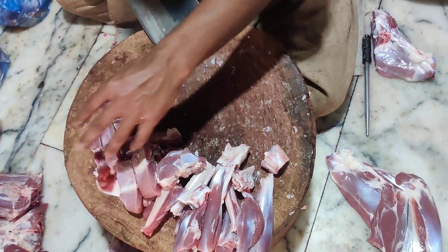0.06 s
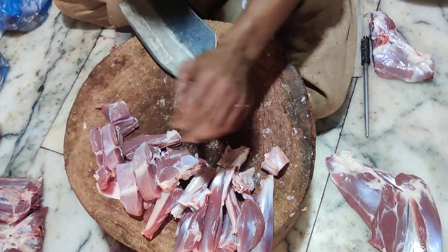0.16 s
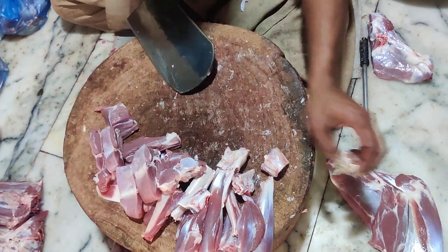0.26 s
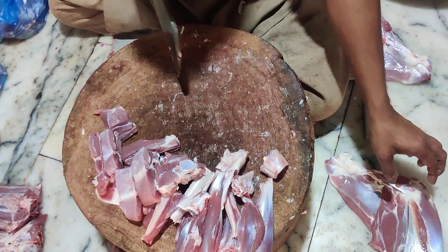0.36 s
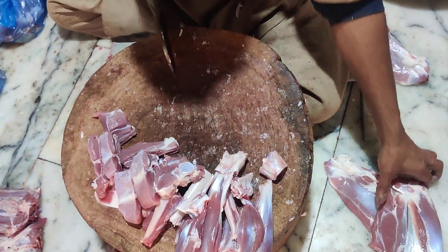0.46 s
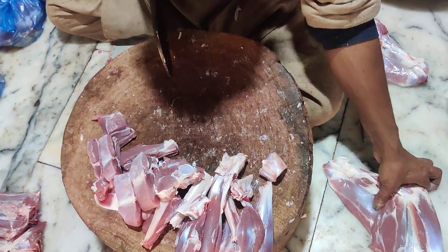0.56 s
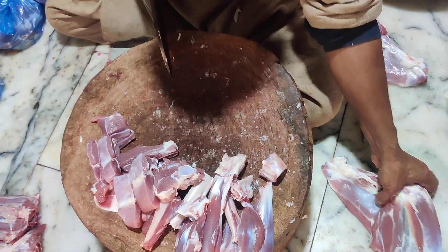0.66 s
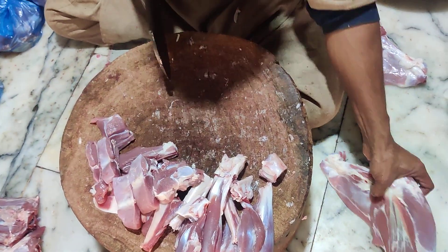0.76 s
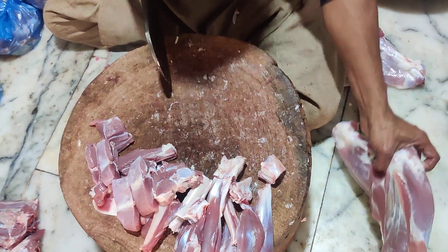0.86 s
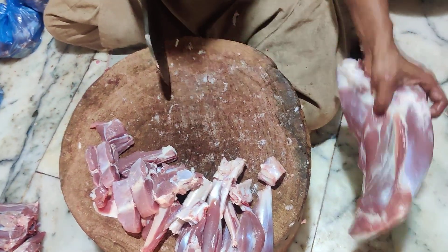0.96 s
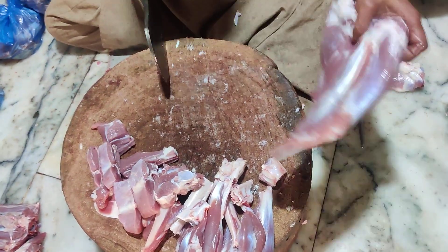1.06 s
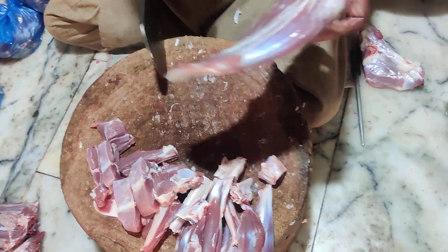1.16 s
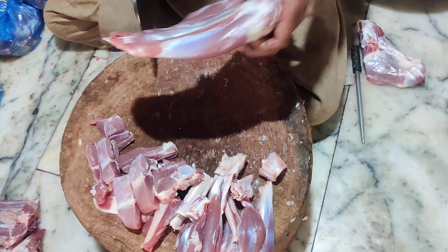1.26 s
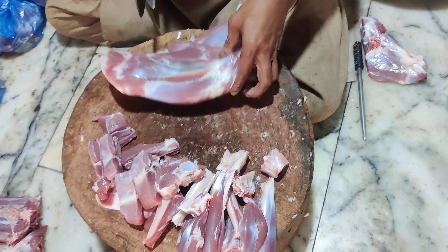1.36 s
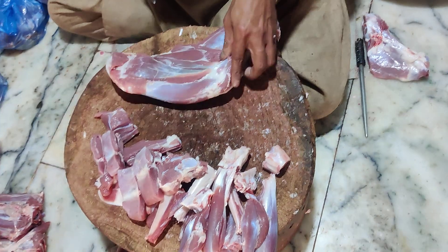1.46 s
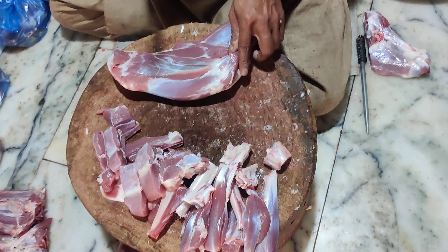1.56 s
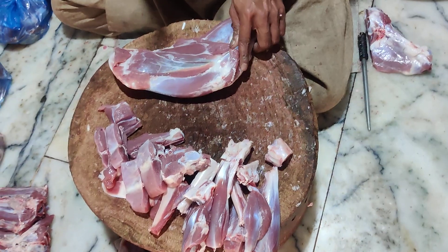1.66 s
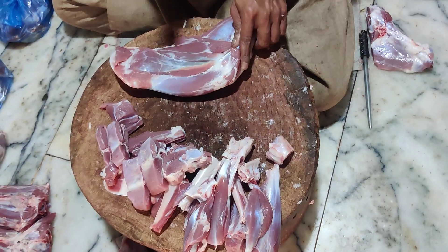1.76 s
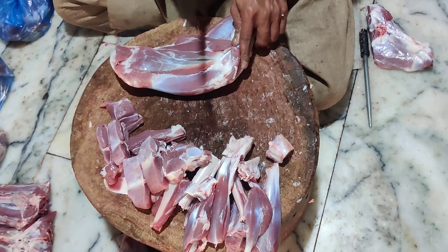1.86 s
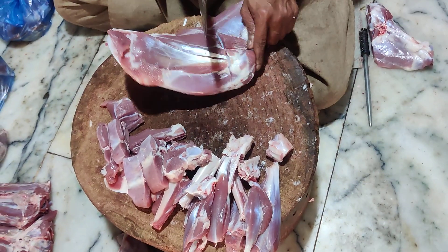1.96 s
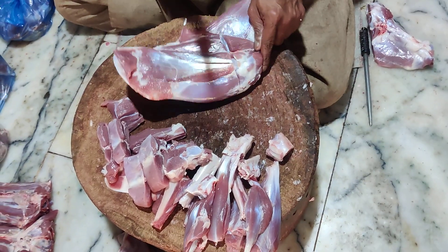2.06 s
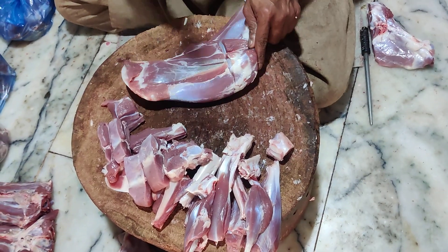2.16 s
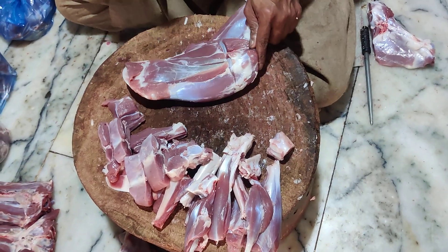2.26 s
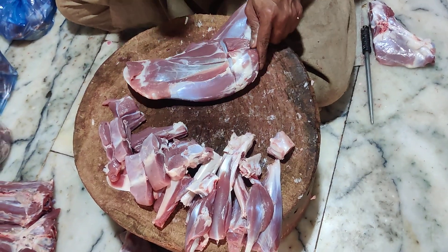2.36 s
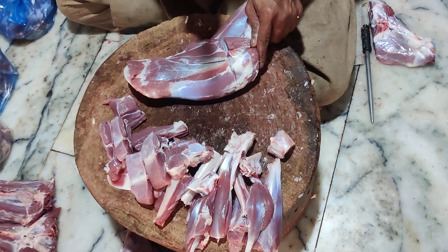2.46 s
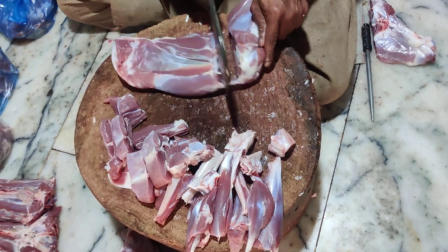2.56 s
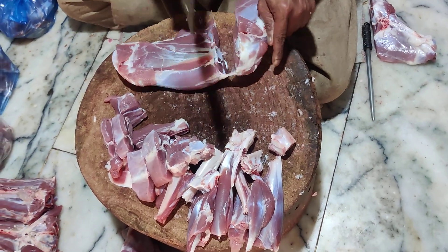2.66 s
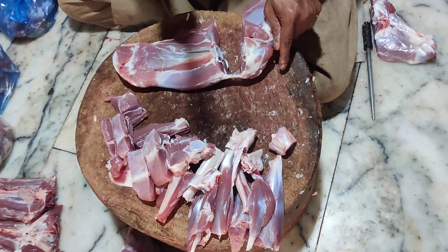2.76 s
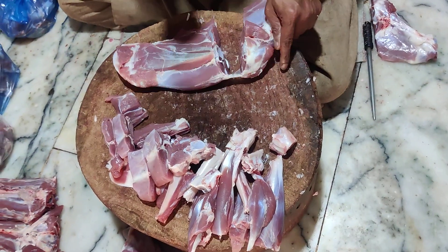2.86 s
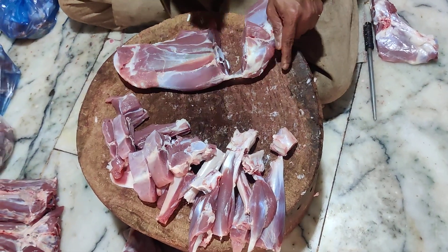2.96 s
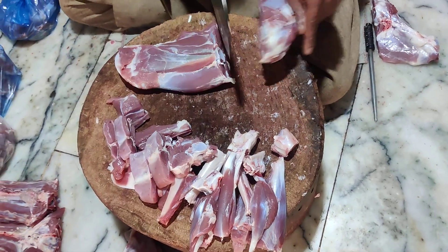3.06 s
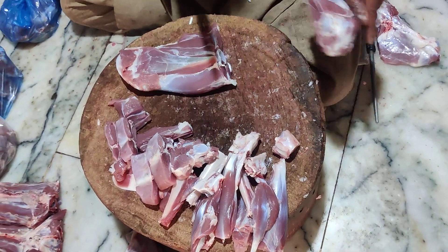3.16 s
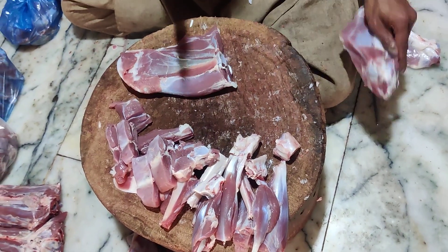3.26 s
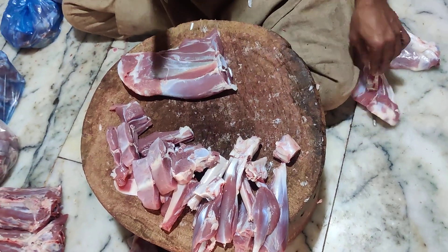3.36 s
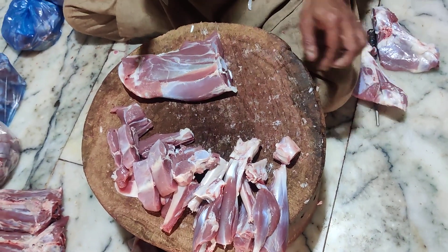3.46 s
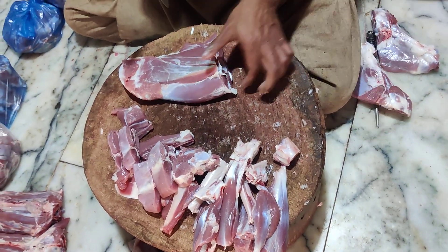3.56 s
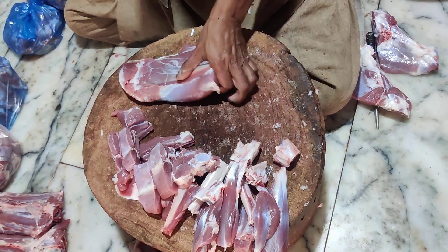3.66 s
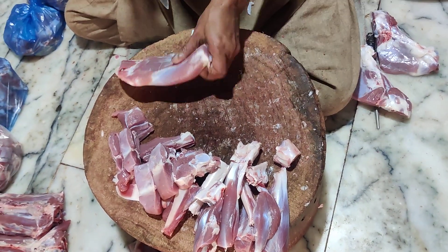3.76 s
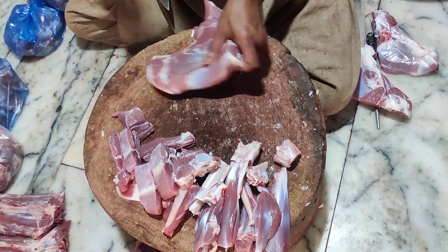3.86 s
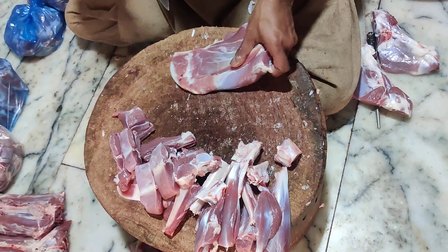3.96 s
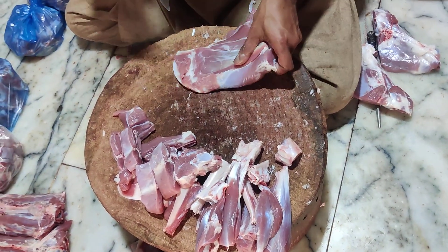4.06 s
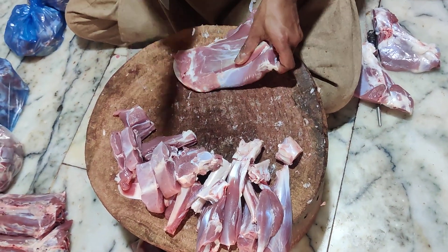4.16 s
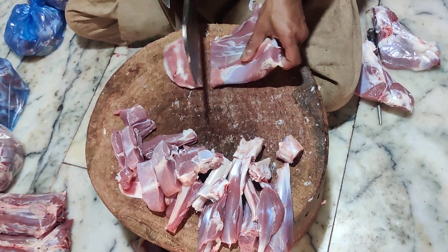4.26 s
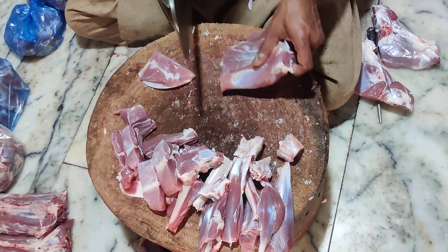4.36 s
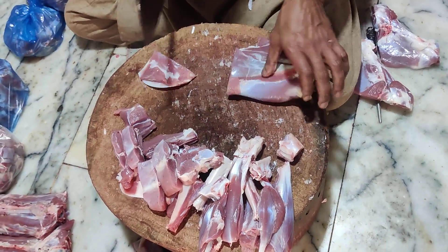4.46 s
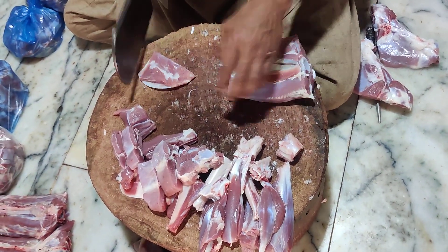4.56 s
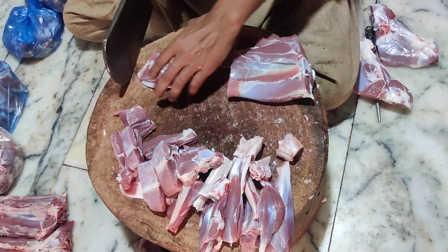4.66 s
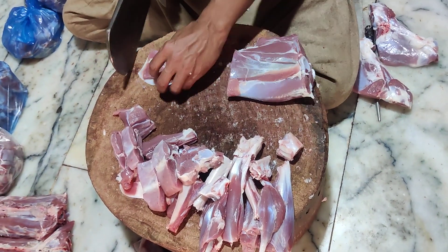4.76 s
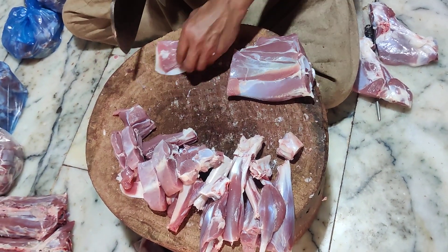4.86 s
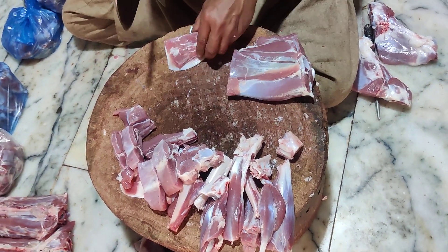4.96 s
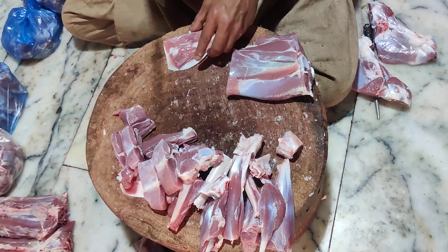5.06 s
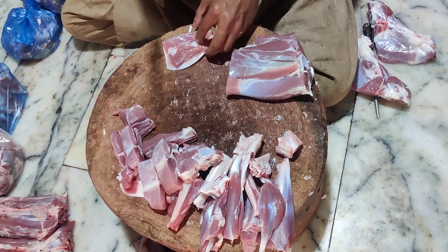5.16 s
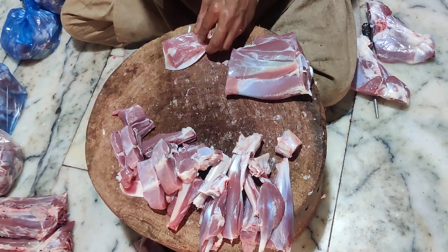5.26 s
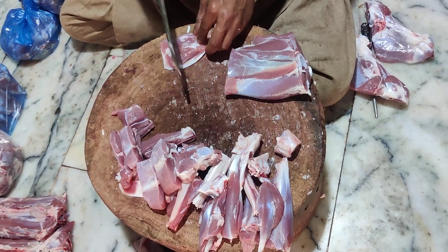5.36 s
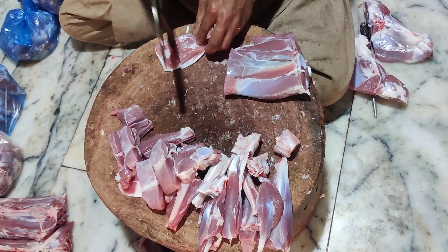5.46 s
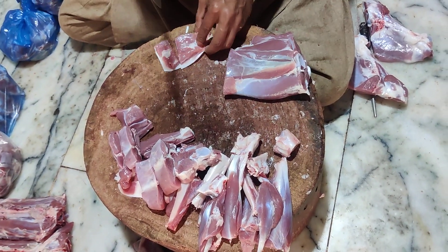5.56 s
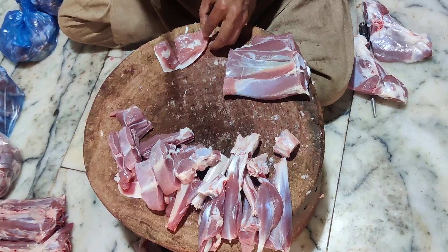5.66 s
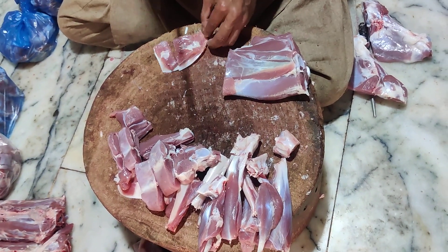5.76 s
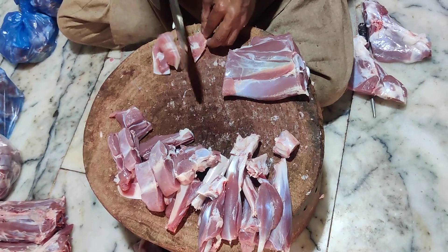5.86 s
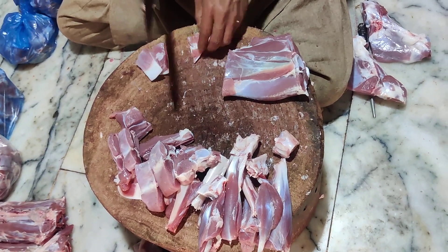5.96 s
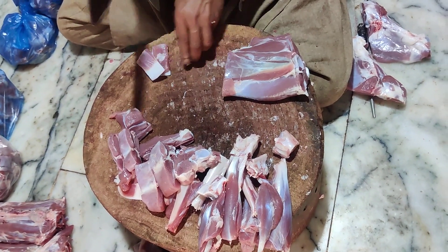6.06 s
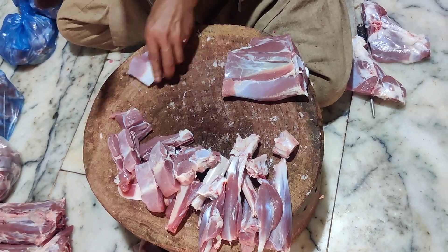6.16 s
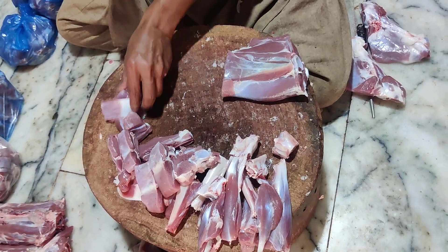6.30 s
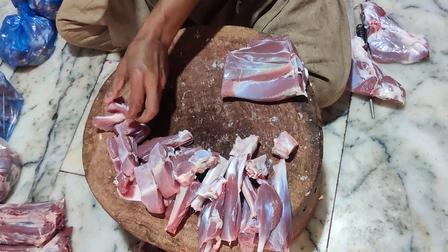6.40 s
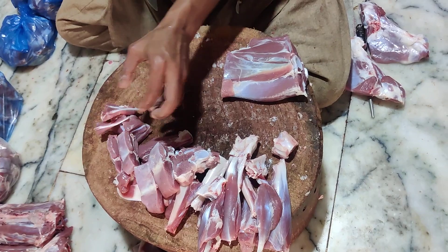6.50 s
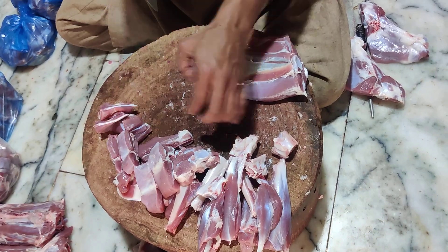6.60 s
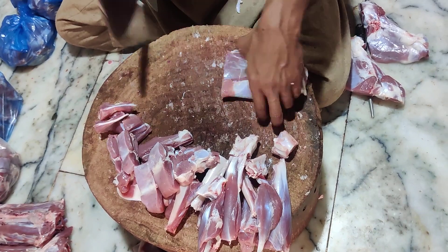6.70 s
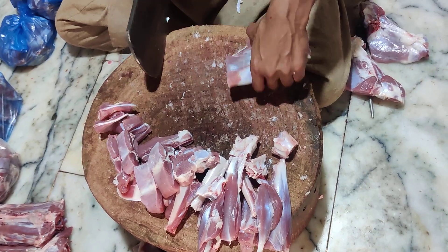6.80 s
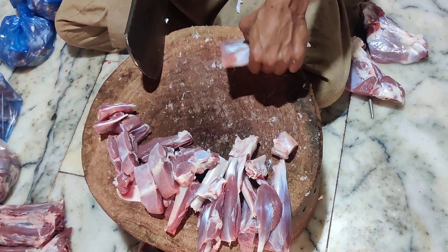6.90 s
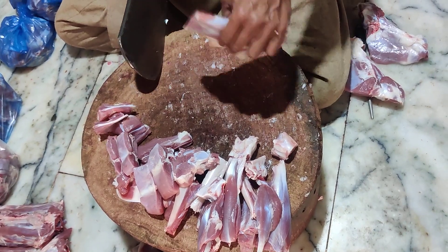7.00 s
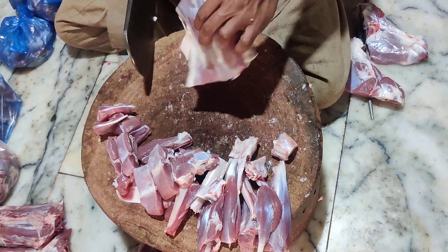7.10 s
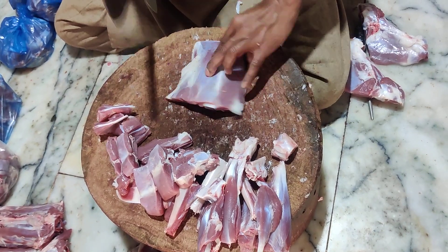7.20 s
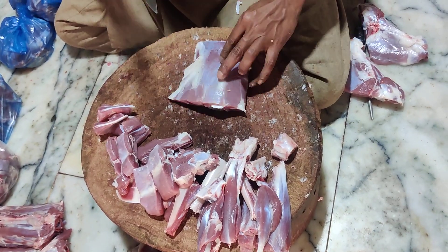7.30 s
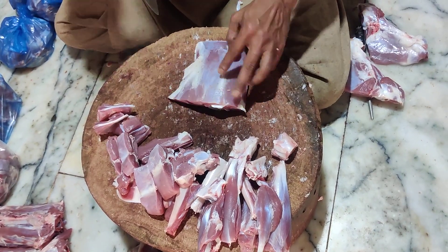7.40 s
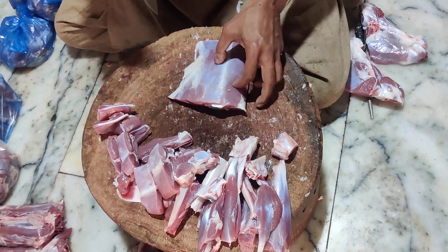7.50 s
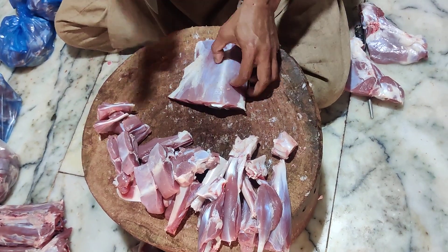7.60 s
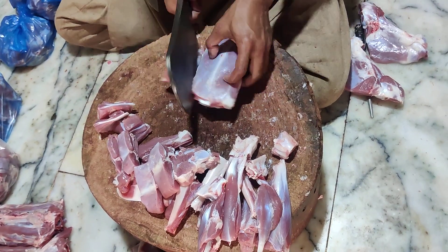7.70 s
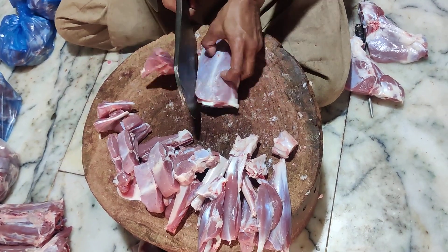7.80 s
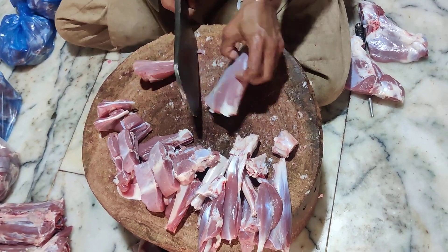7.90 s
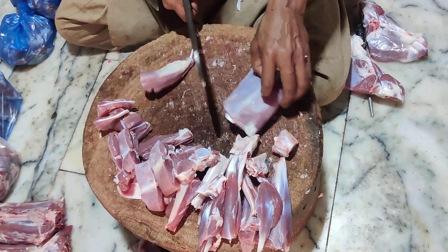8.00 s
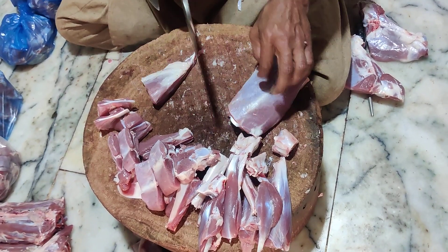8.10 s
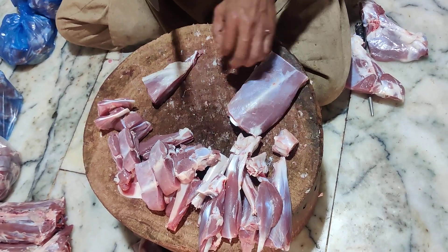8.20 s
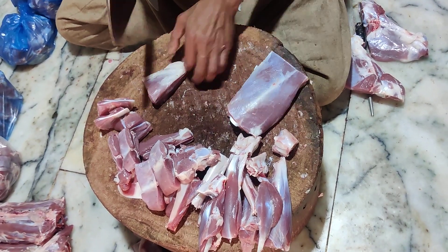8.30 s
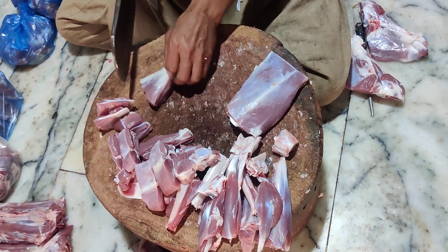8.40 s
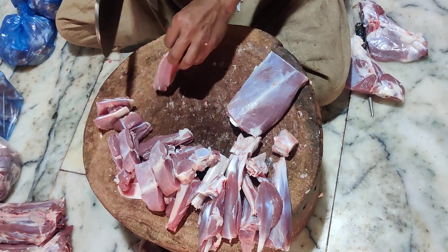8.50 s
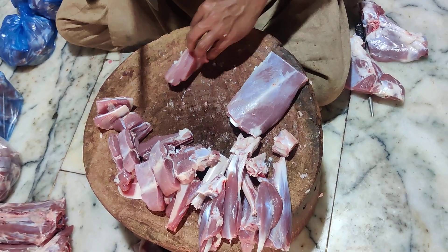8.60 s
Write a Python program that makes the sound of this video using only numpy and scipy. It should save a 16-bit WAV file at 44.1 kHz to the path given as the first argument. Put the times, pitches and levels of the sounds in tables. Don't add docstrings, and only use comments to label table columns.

```python
import sys
import numpy as np
from scipy import signal
from scipy.fft import rfft, irfft, next_fast_len
from scipy.io import wavfile
from scipy.ndimage import uniform_filter1d

SR = 44100
rng = np.random.default_rng(int(sys.argv[2]) if len(sys.argv) > 2 else 0)


def wav_record(signal):
    frames = np.transpose(np.atleast_2d(signal))
    bounded = np.clip(frames, -1, 1)
    quanta = np.round(bounded * 32767).astype(np.int16)
    wavfile.write(sys.argv[1], SR, quanta)


def field_ratio(decibels):
    return 10 ** (np.asarray(decibels, dtype=float) / 20)


N = 381014

PLACES = {"chop": (2.3, -0.01, -2, 0.185, 0.0867, 0.0442, .018),
          "clank": (0.5, -0.7, -2, 0.08, 0.17, 0.0449, 0.16),
          "tap": (1.2, -0.38, -0.57, .04, .03, .02, .015)}
# pitch_hz, level_db, t60_s
TRAY = [(2470, -9, 0.81), (3990, 2.5, 0.28), (5020, 0, 0.19), (5373, -1.5, 0.81), (5960, -3.5, 0.15),
        (6560, -3, 0.37), (7400, -7, 0.19), (8240, -13.5, 0.35), (8441, -20.5, .45), (10700, -10, 0.37),
        (11710, -3.5, 0.5), (13000, -19.5, 0.32), (14350, -12, 0.25), (15800, -7.5, 0.19)]
# pitch_hz, level_db, t60_s
HOOK = [(727, -11, 0.55), (1240, -3.5, 0.49), (2070, 3.5, 0.33), (2290, -2.5, 0.3), (2670, -16, 0.084),
        (2900, -12.5, .4), (3435, -11.5, 0.17), (3950, -18, 0.18), (4662, -22, 0.29), (5660, -32, 0.11)]
# pitch_hz, level_db, t60_s
BLADE = [(1150, -3, 0.15), (1256, 5, .25), (1363, 5.5, 0.28), (1460, 6, 0.17), (2370, -13, 0.48),
         (3200, -5, 0.59), (4100, -11.5, 0.5), (5530, -12.5, 0.44), (9500, -20, 0.24), (9600, -17, .2),
         (11140, -5, 0.22)]
# pitch_hz, level_db, t60_s
ROD = [(2300, -10, .15), (4190, -5, 0.13), (6900, -8, 0.13), (9980, -2, .12), (13340, -6, .1)]
# pitch_hz, level_db, t60_s
PAN = [(3000, -16.5, 0.32), (3650, -9, 0.49), (3950, -8.5, 0.45), (4410, 8, 0.13), (5580, 7, 0.14),
       (5800, -12.5, 0.21), (6200, -14.5, 0.11), (12100, -11, 0.36), (12570, -10.5, 0.21),
       (13500, -12, 0.12), (14470, -8.5, 0.13), (14600, -13, 0.16), (15600, -6.5, 0.35), (15520, 4, 0.065)]
# pitch_hz, level_db, t60_s
EDGE = [(1776, -4, .4), (2716, -1, 0.17), (3973, -11, 0.47), (4802, -27, .18), (5470, -3, 0.27),
        (7090, -22, 0.47), (7709, -13, 0.57), (11000, -21, 0.26)]


def chops(near, far, block):
    # start_s, level_db, weight_db, hard_db
    blows = [
        (2.6175, -5, -6, 1.5),
        (3.111, 0.5, -11.5, -22.5),
        (4.3136, -1, -11.5, -1.5),
        (4.6771, -22.5, -2.5, -10.5),
        (5.4555, -8.5, -5, -8.5),
        (5.8985, -7, -5.5, -6),
        (6.8308, -10, -6.5, -24.5),
        (7.7529, -2, -7, -8),
        (8.4383, -12, -6.5, -23.5),
    ]
    contacts(blows, PLACES["chop"], near, far, lift_db=7.5, crack_db=-1.83, impact_db=1.0,
             wood=field_ratio(-40.0) * block)


def cuts(near, far, block):
    # start_s, level_db, weight_db, hard_db
    strokes = [
        (1.4913, -17, -11.5, -13),
        (1.9968, -18.5, -2.5, 7),
    ]
    contacts(strokes, PLACES["chop"], near, far, lift_db=9.5, crack_db=2.0, wood=field_ratio(-41.0) * block)


def clanks(near, far):
    # start_s, level_db, weight_db, hard_db
    knocks = [
        (0.243, -21, -5.5, 14),
        (0.822, -18.5, -12, -28),
        (0.854, -25.5, -14, -25),
        (0.906, -31, -4, -31.5),
        (7.069, -39, 5, 17),
        (7.132, -38, 1, 15.5),
        (7.155, -32.5, -1, 18.5),
        (7.377, -55, 14, 29),
        (7.389, -50, 8, 4),
        (7.453, -45.5, 2, 21.5),
    ]
    contacts(knocks, PLACES["clank"], near, far, lift_db=5.0, crack_db=0.5)


def taps(near, far, block):
    # start_s, level_db, weight_db, hard_db
    ticks = [(0.052, -28.5, -3.5, -3), (3.446, -36.5, -4, -4), (4.791, -45.5, 2, 16), (5.042, -54.5, 4, 8),
             (5.596, -49, -2, 18)]
    contacts(ticks, PLACES["tap"], near, far, lift_db=7.0, crack_db=-5.0, wood=field_ratio(-46) * block)


def slaps(near, far, block):
    # start_s, level_db, weight_db, hard_db
    hits = [(1.153, -47, 4, 7.5), (1.349, -64, 16, 11), (2.243, -42, -1, -7.5), (2.987, -56, -3, 21.5),
            (3.045, -52, 17, 13), (3.511, -46.5, -5, 7), (6.984, -46.5, -1, 9), (7.270, -21, -24, -29)]
    contacts(hits, PLACES["tap"], near, far, lift_db=8.0, crack_db=9.5, wood=field_ratio(-44) * block)


def scuffs(near, far, block):
    # start_s, level_db, weight_db, hard_db
    rubs = [(0.36, -30, 5, -12), (0.581, -25, 4, -19), (0.695, -18.5, -8.5, -22), (1.091, -48, 3, -10),
            (3.785, -52.5, 18, -12.5), (5.148, -61, 9, 21.5)]
    contacts(rubs, PLACES["tap"], near, far, lift_db=-2.5, crack_db=-1.5, wood=field_ratio(-41) * block)


def contacts(events, place, near, far, lift_db, crack_db, impact_db=-10.0, wood=None):
    layer_edges_hz = [80, 450, 1600, 6000, 17000]
    lead_s, lead_db, impact_lag_s = 0.006, -21, 0.0018
    lead_per_hard = 0.6
    crack_share = 0.59
    pan_db, lag_ms, wet_db, *t60s = place
    layers = [signal.butter(3, edges, "band", fs=SR, output="sos")
              for edges in zip(layer_edges_hz, layer_edges_hz[1:])]
    lead = int(lead_s * SR)
    for s, db, weight_db, hard_db in events:
        layer_db = db + np.array([weight_db, 0, crack_db + crack_share * hard_db, hard_db])
        close, pulse = blow(layers, layer_db, t60s, splinter_db=2.0)
        close = close / np.abs(close).max()
        impact = pulse[:SR // 20] / np.abs(pulse).max()
        add(close, field_ratio(impact_db) * impact, impact_lag_s)
        tear = np.diff(close[:, lead::-1]) * np.linspace(0, 1, lead)
        tear_db = lead_db - lead_per_hard * max(crack_db + hard_db + 7.5, 0)
        tear = field_ratio(tear_db) * tear / np.abs(tear).max()
        direct = np.hstack([tear, close / np.abs(close).max()])
        direct = direct * field_ratio(layer_db[1:].max() + lift_db)
        if wood is not None:
            boom = signal.fftconvolve(pulse, wood)[:SR // 2]
            add(near, boom, s)
            add(far, boom * field_ratio(-5.0), s)
        add(near[0], direct[0] * field_ratio(pan_db / 2), s - lead_s + lag_ms / 2000)
        add(near[1], direct[1] * field_ratio(-pan_db / 2), s - lead_s - lag_ms / 2000)
        add(far, pulse * field_ratio(wet_db), s)


def blow(layers, layer_db, t60s, splinter_db):
    likeness = [0.86, 0.44, 0.24, 0.36]
    noise = rng.standard_normal((3, SR // 8))
    length = noise.shape[1]
    grit = noise[:2] * field_ratio(splinter_db * uniform_filter1d(noise[2], size=25) * 5.8)
    click = signal.unit_impulse(length)
    bite = 1 - fade(0.003, 1)[:length]
    close, pulse = 0, 0
    for sos, db, t60, like in zip(layers, layer_db, t60s, likeness):
        burst = pair(grit, like) * fade(t60, 1)[:length] * bite
        left, right, even = signal.sosfilt(sos, [*burst, click])
        close = -close + field_ratio(db) * np.array([left, right]) / np.abs(left).max()
        energy_gain = np.sqrt(t60 * SR / 50 / np.sum(even ** 2))
        pulse = -pulse + field_ratio(db) * even * energy_gain
    return close, pulse


def wooden_block():
    # pitch_hz, level_db, t60_s
    block_modes = [(99.8, -13.5, 0.37), (160, -10.5, 0.37), (250.4, -3.5, 0.19), (333.4, -4, 0.14),
                   (455, -5, 0.1), (535.7, -1.5, 0.082), (618, -1, 0.066), (737.7, -5.5, 0.13),
                   (960, -7, 0.073), (1044, -3.5, 0.066)]
    return ring(block_modes, spread_db=0.5, waver_db=-0.5)[0]


def steel(near, far):
    # start_s, object, level_db
    strikes = [(0.243, TRAY, -25), (.822, HOOK, -27.5), (.858, HOOK, -31), (.878, HOOK, -31.5),
               (.907, HOOK, -39.5), (1.999, BLADE, -28.5), (3.512, ROD, -34), (7.066, PAN, -49),
               (7.134, PAN, -45.5), (7.156, PAN, -25.5), (7.21, PAN, -38), (7.25, PAN, -37),
               (7.29, PAN, -43), (7.378, PAN, -55), (7.453, PAN, -41), (8.442, EDGE, -36.5)]
    crowd = rattle(2600, 0.26, count=48)
    for s, modes, db in strikes:
        if modes is TRAY or modes is PAN:
            modes = modes + crowd
        left, right, walls = field_ratio(db) * ring(modes, channels=3)
        add(near, np.array([field_ratio(-1.0) * left, field_ratio(-7.5) * right]), s)
        add(far, field_ratio(-4.5) * walls, s)


def ring(modes, spread_db=2.0, waver_db=5.0, longest_s=0.46, channels=1):
    waver_steps = 70
    hz, db, t60 = np.float32(modes).T[:, :, None]
    t = np.arange(SR // 2, dtype=np.float32) / SR
    chance = rng.standard_normal((len(modes), 7 + waver_steps), dtype=np.float32)
    start, strength, sign, waver = np.split(chance, [1, 4, 7], axis=1)
    step = len(t) // waver_steps
    waver = uniform_filter1d(np.repeat(waver, step, axis=1), size=step, axis=1)
    decay_db = -60 * t / np.clip(t60, 0.02, longest_s)
    phase = 2 * np.pi * hz * t + np.pi * start + 0.81 * waver[:, ::-1]
    partials = field_ratio(db + waver_db * waver + decay_db) * np.sin(phase)
    return (field_ratio(spread_db * strength) * np.sign(sign)).T[:channels] @ partials


def rattle(lo_hz, t60, count):
    chance = rng.random((count, 2))
    return [(lo_hz * (15500 / lo_hz) ** a, -8.0 * b - 4.0, t60 * (1 - a / 3) * (0.5 + b))
            for a, b in chance]


def rustle(near, far):
    # start_s, length_s, level_db, lowest_hz
    drags = [(0.057, 0.1, -42.5, 2500), (0.687, 0.19, -51, 2900), (1.153, 0.1, -52, 3000),
             (1.477, 0.026, -45, 3000), (2.994, 0.14, -48.5, 3000), (3.182, 0.052, -51, 5940),
             (3.941, 0.11, -52.5, 3000), (4.188, 0.079, -55, 3970), (4.797, 0.093, -52.5, 5000),
             (5.311, 0.17, -51.5, 5020), (5.591, 0.069, -50, 5900), (6.102, 0.14, -50.5, 6000),
             (6.977, 0.072, -41, 2960)]
    for s, length_s, db, lo_hz in drags:
        noise = rng.standard_normal((3, SR // 3))[:, :int(length_s * SR)]
        swell = np.sin(np.pi * np.linspace(0, 1, noise.shape[1]) ** 0.4)
        slips = band(noise[:2] * field_ratio(2.5 * np.abs(noise[2])), lo_hz, 17000) * swell * field_ratio(db)
        add(near, slips, s)
        add(far, slips[0], s)


def room():
    # centre_hz, t60_s, level_db, rise_ms, left-right likeness (0-1)
    octaves = [(89, 2.05, -2, 30, 1), (181.6, 0.92, 5, 32, 1), (343, 0.78, 5.5, 12.5, 0.98),
               (688, 0.74, 7, 2.2, 0.2), (1454, 0.72, 0.5, 4.6, 0), (2700, 0.71, 2.5, 5, 0.07),
               (6000, 0.67, 0.5, 4.8, 0), (11500, 0.33, -4, 7.6, 0)]
    early_t60_s, early_db = 0.062, 4
    t, out = np.arange(SR) / SR, 0
    for hz, t60, db, rise_ms, like in octaves:
        noise = lumpy(rng.standard_normal((2, len(t))), peak_db=2.5, lump_db=2.0)
        echoes = band(pair(noise, like), hz / np.sqrt(2), hz * np.sqrt(2))
        decay = fade(t60, 1) + field_ratio(early_db) * fade(early_t60_s, 1)
        echoes = echoes * decay * (1 - np.exp(-(t * 1000 / rise_ms) ** 2))
        out = out + field_ratio(db) * echoes * np.sqrt(2 * np.sqrt(2) * hz / SR / np.sum(echoes ** 2))
    return out


def lumpy(noise, peak_db, lump_db):
    chance = rng.standard_normal((2, 400))
    grid = np.linspace(0, 1, chance.shape[1])
    spectrum = rfft(noise)
    peaks = np.interp(np.linspace(0, 1, spectrum.shape[1]), grid, chance[0])
    lumps = np.interp(np.linspace(0, 1 / 5, noise.shape[1]), grid, chance[1])
    return irfft(spectrum * field_ratio(peak_db * peaks), noise.shape[1]) * field_ratio(lump_db * lumps)


def street():
    # pitch_hz, level_db (per Hz)
    hum = [(36, 3), (55, -33), (102, -12.5), (217, -22.5), (1020, -37.5), (4250, -51), (9080, -52),
           (15500, -67)]
    # start_s, draught_db, swell_db
    air = [(0.0, -46, 2), (1.59, -39.5, 3), (3.8, -44.5, 0), (4.16, -35, 2), (4.6, -44, -1),
           (5.25, -40.5, 0.5), (7.0, -39.5, 2), (8.08, -46, -1), (8.64, -45, 1)]
    street_db = -39.5
    s, draught_db, swell_db = np.transpose(air)
    t, out, size = np.arange(N) / SR, 0, next_fast_len(N)
    log_hz = np.log2(np.arange(size // 2 + 1) * SR / size + 1)
    hz_axis, db_axis = np.transpose(hum)
    like = np.interp(log_hz, np.log2([130, 290, 640, 1400]), [1.0, 0.96, 0.64, 0.008])
    noise = rng.standard_normal((2, N))
    coloured = pair(rfft(noise, size), like) * field_ratio(np.interp(log_hz, np.log2(hz_axis), db_axis))
    for octave in np.arange(6, 15):
        share = np.clip(1 - np.abs(log_hz - octave), 0, 1)
        out = out + walk_gain(8.7, 2.04) * irfft(coloured * share, size)[:, :N]
    out = out * np.interp(t, s, field_ratio(street_db - 3.5 + swell_db)) / out.std()
    out = out * field_ratio(np.array([[0.5], [-0.5]]))
    draught = pair(band(noise[::-1], 12, 38), 0.7)
    return out + draught / draught.std() * np.interp(t, s, field_ratio(draught_db + 0.5))


def walk_gain(rate, spread_db):
    levels = rng.standard_normal(N // 2000)[:int(N / SR * rate) + 2]
    return np.interp(np.linspace(0, len(levels) - 0.5, N), np.arange(len(levels)), field_ratio(spread_db * levels))


def pair(noise, like):
    like = np.clip(like, 0, 1)
    opposed = noise[1] * np.array([[1], [-1]])
    return np.sqrt((1 + like) / 2) * noise[0] + np.sqrt((1 - like) / 2) * opposed


def band(x, lo_hz, hi_hz, order=2):
    edges = [lo_hz, min(hi_hz, 0.45 * SR)]
    return signal.sosfilt(signal.butter(order, edges, "band", fs=SR, output="sos"), x)


def fade(t60, length_s):
    return np.exp(-np.log(1000) * np.arange(int(length_s * SR)) / SR / t60)


def add(track, sound, s):
    i = max(int(s * SR), 0)
    track[..., i:i + sound.shape[-1]] += sound[..., :N - i]


def scene():
    near, far = np.zeros((2, N)), np.zeros(N)
    block = wooden_block()
    chops(near, far, block)
    cuts(near, far, block)
    clanks(near, far)
    taps(near, far, block)
    slaps(near, far, block)
    scuffs(near, far, block)
    steel(near, far)
    rustle(near, far)
    return near + signal.fftconvolve(far[None], room(), axes=1)[:, :N] + street()


def top_cut(x):
    return signal.sosfilt(signal.butter(12, 16510, fs=SR, output="sos"), x)


def record(dry):
    # pitch_hz, level_db
    mic = [(1000, 1), (6100, 8.5), (6500, 0.5), (8000, -3.5), (11000, 2.5), (15500, 6.5), (15900, -18.5),
           (16400, -27.5)]
    # pitch_hz, left minus right (dB)
    ports = [(300, -0.5), (700, 1), (8000, 2), (13000, 7)]
    lopsided = 0.054
    size = next_fast_len(N)
    log_hz = np.log(np.arange(size // 2 + 1) * SR / size + 1)
    colour_db, lean_db = (np.interp(log_hz, np.log(hz), db)
                          for hz, db in (np.transpose(mic), np.transpose(ports)))
    gain = field_ratio(colour_db + np.array([[0.5], [-0.5]]) * lean_db)
    x = irfft(rfft(dry, size) * gain, size)[:, :N]
    x = x / (1 + np.abs(x / 1.15) ** 4) ** 0.45
    return top_cut(x - lopsided * x ** 2)


dry = scene()
out = record(dry)
wav_record(out)
```